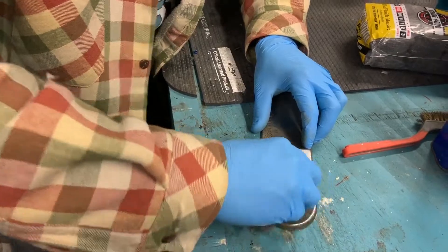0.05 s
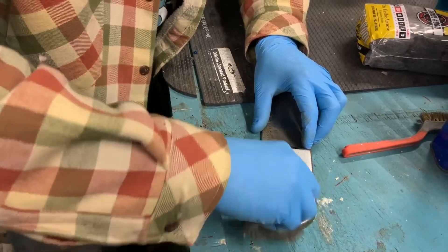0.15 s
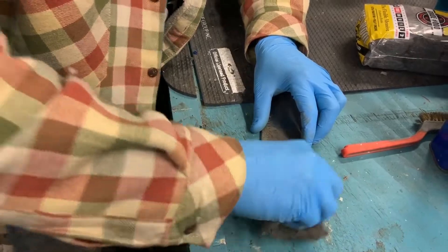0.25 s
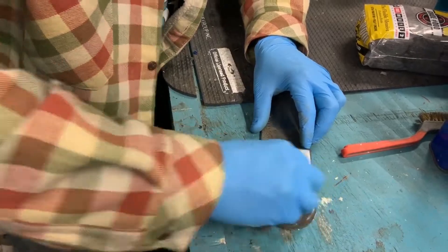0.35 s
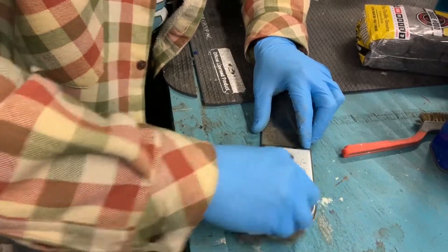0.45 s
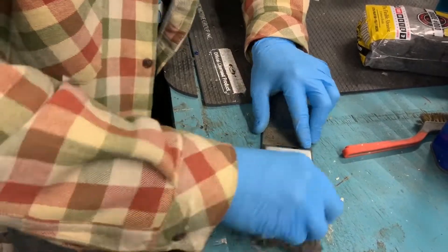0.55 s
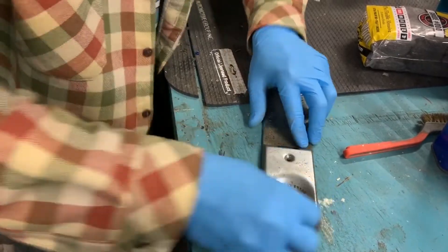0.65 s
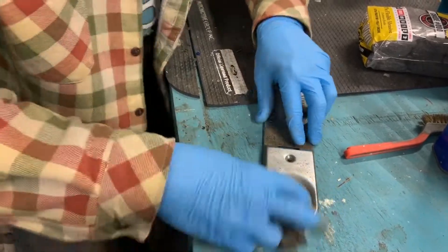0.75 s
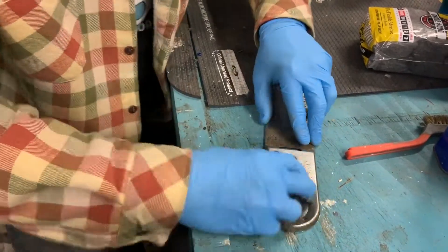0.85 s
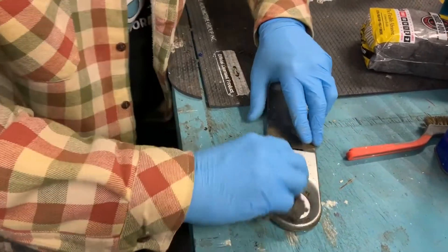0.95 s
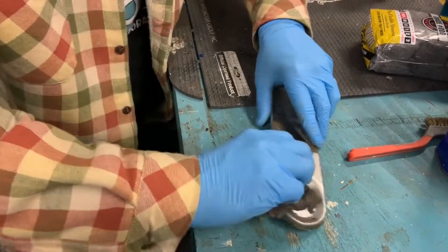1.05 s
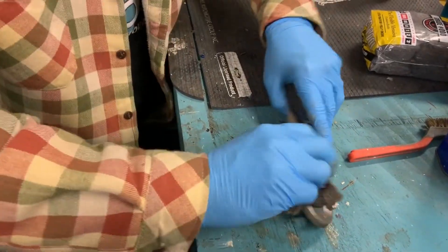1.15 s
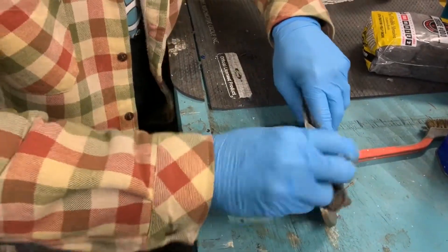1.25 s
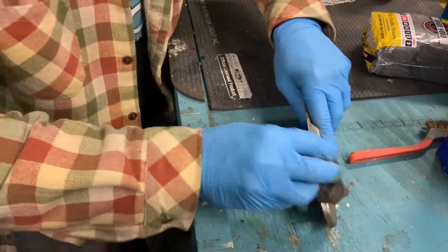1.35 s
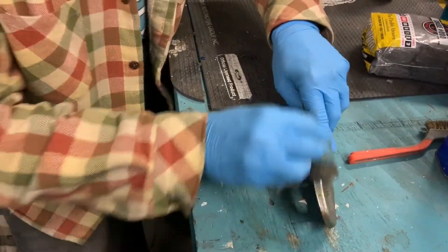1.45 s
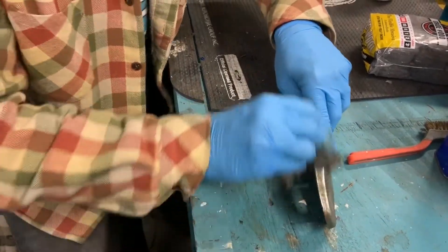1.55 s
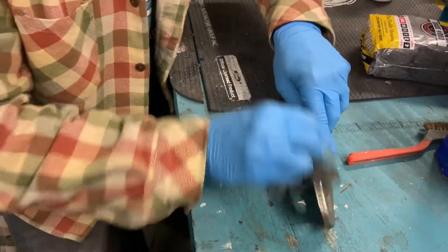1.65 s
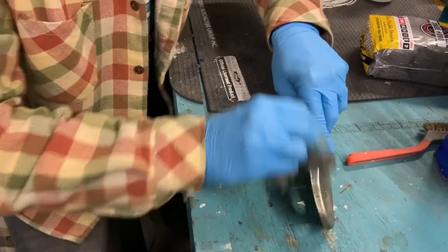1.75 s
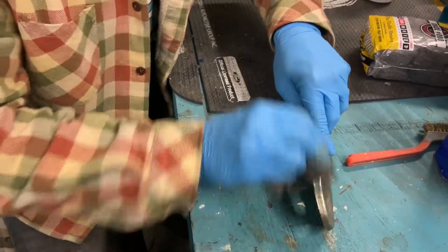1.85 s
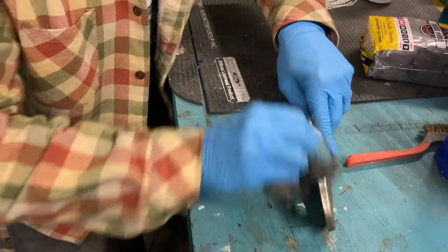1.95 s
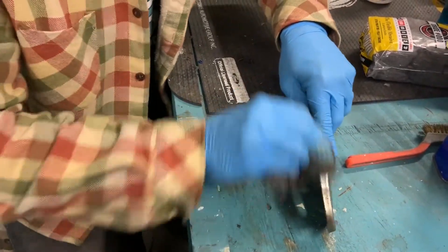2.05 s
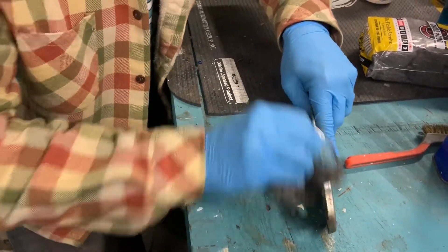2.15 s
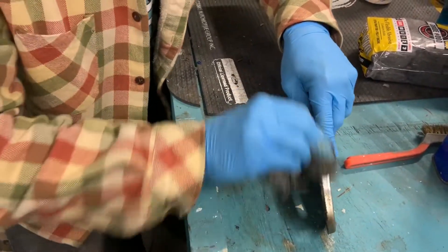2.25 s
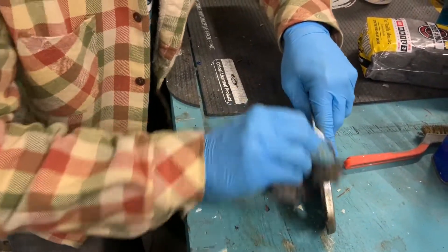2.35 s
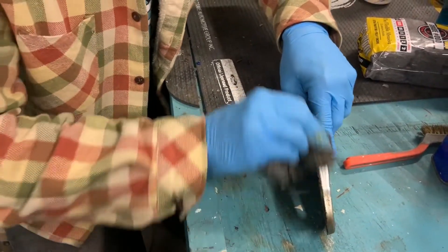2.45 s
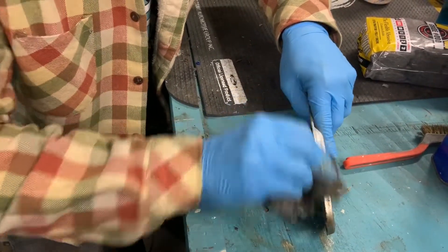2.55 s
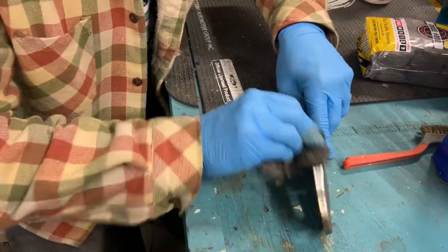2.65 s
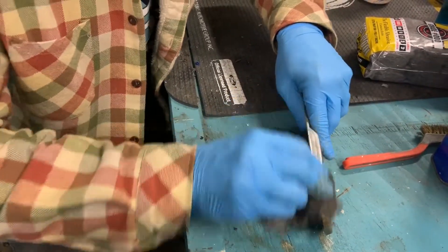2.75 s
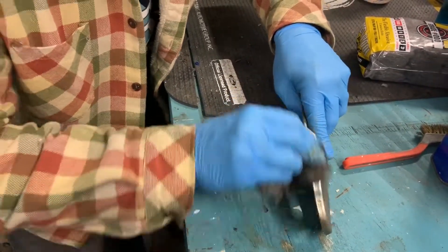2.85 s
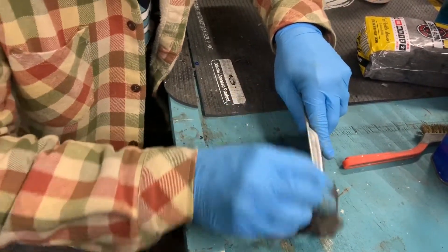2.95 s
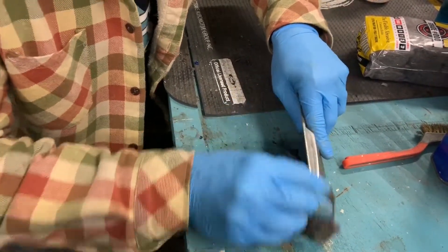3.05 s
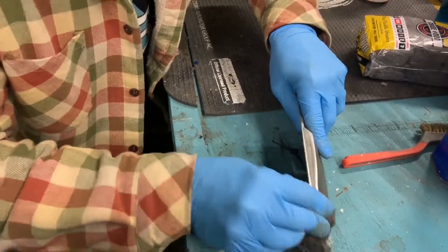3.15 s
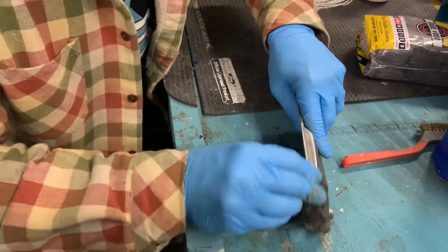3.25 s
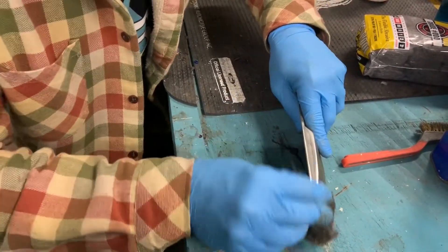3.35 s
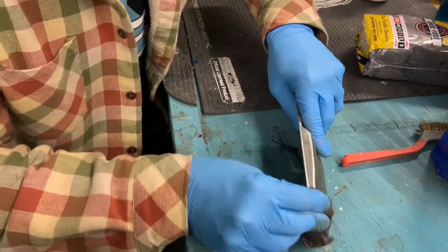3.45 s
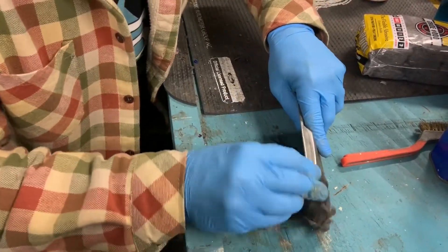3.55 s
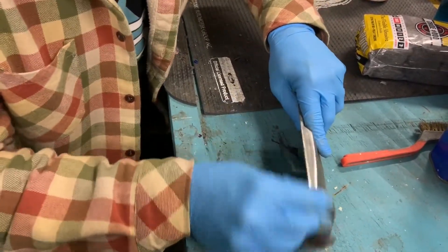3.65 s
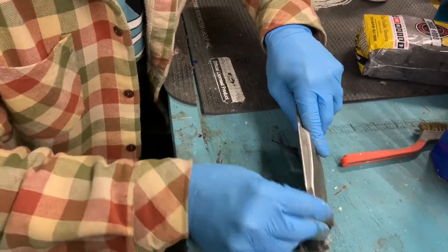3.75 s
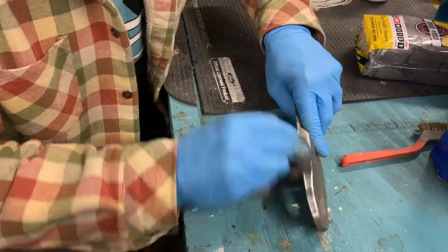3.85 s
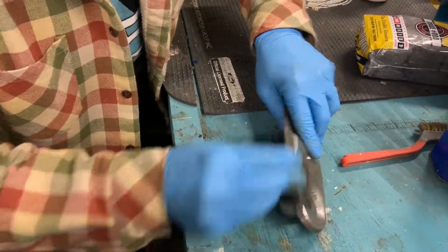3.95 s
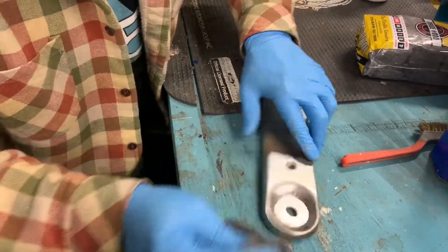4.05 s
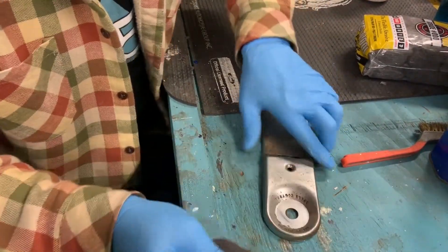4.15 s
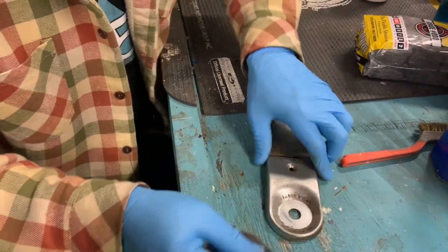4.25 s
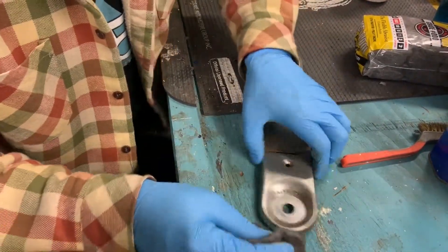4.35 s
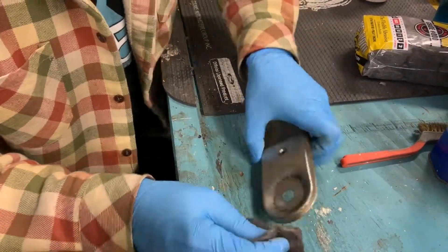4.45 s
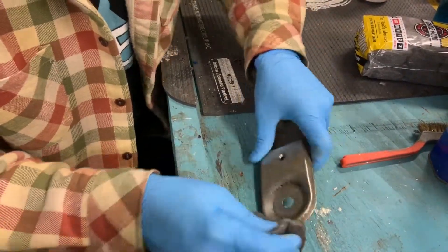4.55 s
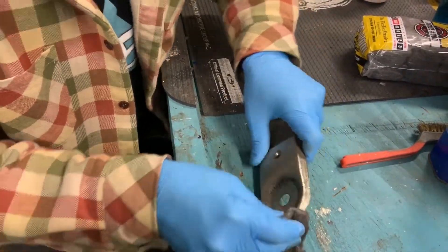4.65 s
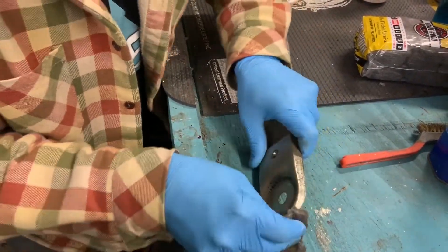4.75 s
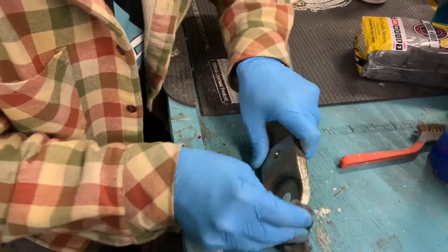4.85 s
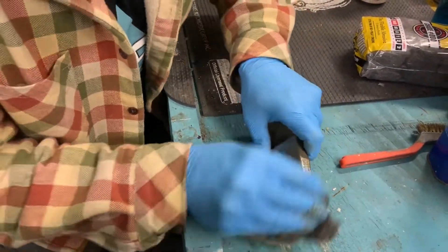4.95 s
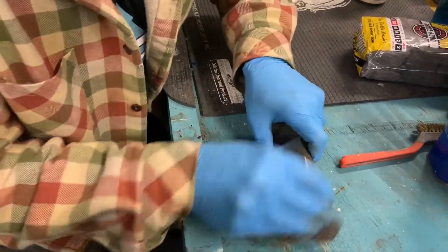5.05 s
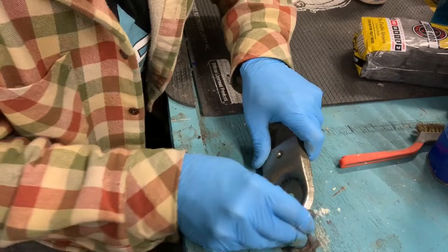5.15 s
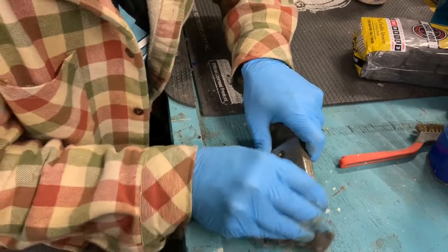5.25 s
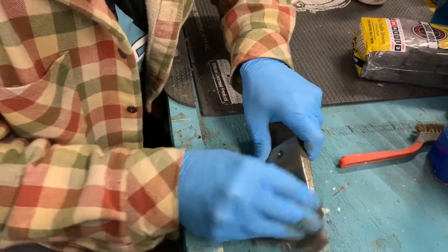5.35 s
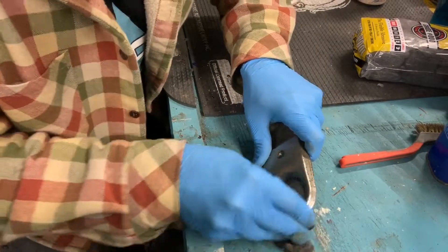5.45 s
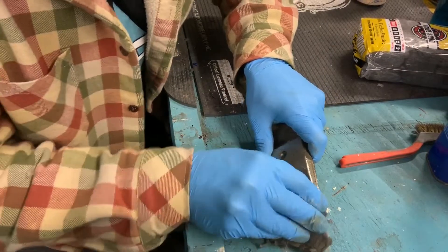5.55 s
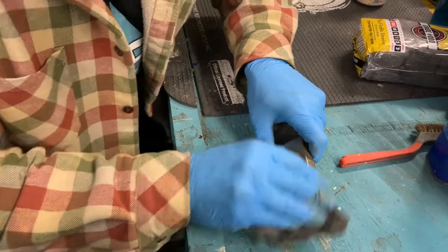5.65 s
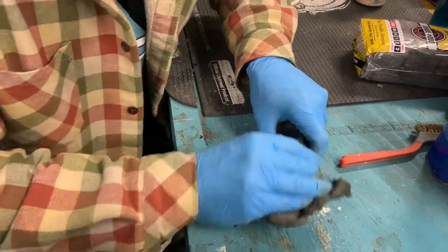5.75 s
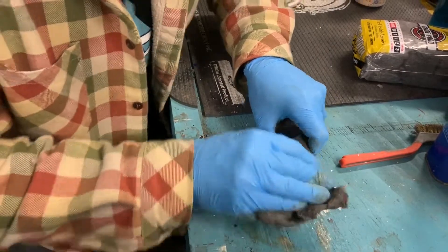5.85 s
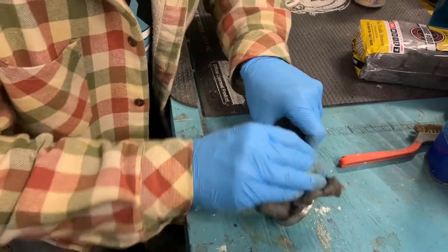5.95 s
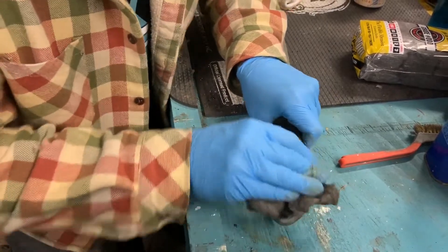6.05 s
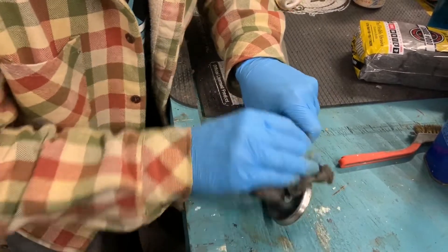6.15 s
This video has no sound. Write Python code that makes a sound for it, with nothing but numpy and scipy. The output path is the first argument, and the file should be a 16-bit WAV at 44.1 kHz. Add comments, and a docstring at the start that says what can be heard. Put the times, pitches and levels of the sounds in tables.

```python
"""In a small workshop, a gloved hand scrubs a chromed steel bracket with steel wool on a wooden bench.
Quick strokes drive noisy wire slips: they hiss, sing through steel resonances and make the bench drone.
The bracket tips over with a sharp clink, chatters, and is ticked and knocked upright: noise bursts and
decaying steel modes. Soft bumps, rustle and thin squeaks come from the handling. A close two-port
microphone hears it over low room tone and high hiss."""
import sys
import numpy as np
from scipy import signal
from scipy.fft import rfft, irfft, next_fast_len
from scipy.io import wavfile
from scipy.ndimage import uniform_filter1d, map_coordinates

SR = 44100
rng = np.random.default_rng(int(sys.argv[2]) if len(sys.argv) > 2 else 0)


def put_to_file(sound):
    """Save the sound as 16-bit audio at rate SR, in the file named by the first command-line argument."""
    columns = np.atleast_2d(sound).T  # one column per channel
    safe = np.clip(columns, -1, 1)
    whole_steps = np.round(safe * 32767)
    wavfile.write(sys.argv[1], SR, whole_steps.astype(np.int16))


N = 273861  # length in samples


def amp(db):
    """Decibels to gain."""
    return 10 ** (np.asarray(db) / 20)


def unit(x):
    """Scaled to rms 1."""
    return x / np.sqrt(np.mean(x ** 2) + 1e-20)


def along(points, hz):
    """(Hz, value) points read on a log frequency axis."""
    point_hz, values = np.transpose(points)
    return np.interp(np.log(hz + 1), np.log(point_hz + 1), values)


def at(rows, s):
    """The columns of a time curve, read at s seconds."""
    times, *columns = np.transpose(rows)
    return np.array([np.interp(s, times, column) for column in columns])


def colour(points):
    """Response through (Hz, dB) points, falling away beyond the ends."""
    lowest_hz, highest_hz = points[0][0], points[-1][0]

    def response(hz):
        falloff = 1 + (lowest_hz / (hz + 1)) ** 4 + (hz / highest_hz / 2) ** 8
        return amp(along(points, hz)) / np.sqrt(falloff)
    return response


def body(modes):
    """Causal response of a few damped resonances, (Hz, width Hz, dB), of alternating sign."""
    def response(hz):
        total = 0
        for k, (centre, width, db) in enumerate(modes):
            damping = 1j * hz * width
            total = total + (-1) ** k * amp(db) * damping / (centre * centre - hz * hz + damping)
        return total
    return response


def filtered(x, response):
    """x shaped by a response of frequency."""
    n = x.shape[-1]
    padded = next_fast_len(n + 8192)
    spectrum = rfft(x, padded) * response(np.fft.rfftfreq(padded, 1 / SR))
    return irfft(spectrum, padded)[..., :n]


def wobble(rate):
    """A smooth random curve, rate knots a second."""
    knots = rng.standard_normal(int(N * rate / SR) + 4)
    return map_coordinates(knots, [np.arange(N) * rate / SR])


# likeness of the two ports: pitch_hz, likeness (correlation, 0-1)
LIKENESS = [(300, 0.97), (800, 0.76), (1200, 0.79), (1700, 0.38), (2600, 0.03), (4000, 0.34), (5500, 0.047),
            (6800, 0.14), (7800, 0.99), (15500, 1)]


def ports(pair):
    """Two unrelated signals become left and right, as alike at each frequency as the table asks."""
    def mid_side(hz):
        turn = np.arccos(np.clip(along(LIKENESS, hz), -1, 1)) / 2
        return np.array([np.cos(turn), np.sin(turn)])
    mid, side = filtered(pair, mid_side)
    return np.array([mid + side, mid - side])


def noise(response, size=N):
    """Coloured stereo noise of rms 1."""
    return unit(ports(filtered(rng.standard_normal((2, size)), response)))


def add(track, s, sound):
    """Mix a sound in at s seconds."""
    part = track[:, round(s * SR):][:, :sound.shape[-1]]
    part += sound[..., :part.shape[-1]]


def slips(drive, response, rate, smooth):
    """Wires catch and let go: tiny kicks (rate per s) over a smooth rub (share 0-1), ringing in a body."""
    chance = np.clip(rate / SR, 1e-4, 1)
    kicks = (rng.random(N) < chance) / chance
    share = np.clip(smooth, 0, 1)
    force = np.sqrt((1 - share) * kicks + share) * rng.standard_normal((2, N))
    response_rms = np.sqrt(np.mean(abs(response(np.linspace(0, SR / 2, 4096))) ** 2))
    return filtered(force * drive, response) / response_rms


def shifting(x, patchy_db):
    """The wires in contact keep changing, and the colour of the rub with them."""
    z = signal.stft(x, nperseg=512)[2]
    field = rng.standard_normal(z.shape[1:])
    field = uniform_filter1d(field, size=3, axis=0)  # blur across frequency
    field = uniform_filter1d(field, size=9, axis=1)  # blur across time
    gain = unit(amp(patchy_db * unit(field)))
    return signal.istft(z * gain, nperseg=512)[1][:, :N]


# spectra of the steady bed, relative before levelling: pitch_hz, level_db
ROOM_TONE = [(22, -1.5), (45, -1), (85, -3.5), (150, -16), (300, -12), (700, -30), (1300, -13),
             (2500, -41.5), (5000, -14.5), (7000, -44.5)]
HISS = [(6500, -32), (7800, -30), (8200, -1.5), (9500, 3.5), (10500, -0.5), (11600, -0.5), (12600, -5.5),
        (13800, 3.5), (15700, -0.5)]


def background():
    """Low room tone and a high hiss, each gently unsteady in level."""
    room_tone = amp(-55.0 + 2 * wobble(5.5)) * noise(colour(ROOM_TONE))
    hiss = amp(-43.0 + 2.7 * wobble(7.3)) * noise(colour(HISS))
    return room_tone + hiss


# strokes of the pad, pull and push in turn, level before swell and layer trims: start_s, end_s, level_db
STROKES = [(-.02, .115, -41.5), (.13, .255, -39.5), (.295, .44, -40.5), (.475, .555, -44),
           (.709, .828, -54.5), (1.018, 1.073, -51.5), (1.155, 1.244, -45), (1.379, 1.476, -30.5),
           (1.508, 1.587, -29.5), (1.609, 1.672, -27), (1.704, 1.79, -34), (1.801, 1.872, -25.5),
           (1.898, 1.975, -29), (1.997, 2.057, -23), (2.098, 2.168, -26.5), (2.19, 2.263, -25),
           (2.292, 2.366, -28), (2.401, 2.452, -28), (2.485, 2.55, -29), (2.568, 2.643, -29),
           (2.662, 2.756, -30.5), (2.782, 2.847, -31), (2.87, 2.952, -30.5), (3.02, 3.081, -34.5),
           (3.113, 3.244, -37.5), (3.29, 3.364, -37), (3.453, 3.533, -37.5), (3.585, 3.682, -33),
           (3.735, 3.858, -37), (4.197, 4.275, -45.5), (4.773, 4.864, -52), (4.87, 4.977, -37),
           (5.004, 5.063, -35.5), (5.156, 5.253, -41.5), (5.321, 5.389, -35), (5.436, 5.523, -43),
           (5.567, 5.692, -38), (5.72, 5.778, -46), (5.841, 5.901, -38.5), (5.937, 5.996, -40),
           (6.045, 6.107, -34), (6.145, 6.232, -33)]
# how the pad bears on the bracket; flat faces rasp, the edge fizzes, the tip shakes the bench;
# drives relative to the fizz: time_s, scrape_db, plate_rasp_db, bench_drone_db
CONTACT_COLOUR = [(.04, -20, 12.5, -3.5), (.18, -13, -0.5, -27), (.5, -14, 1, -18), (.8, 3.5, 5, -5.5),
                  (1.04, 5.5, 10, 6), (1.2, -3.5, -14, -16), (1.43, -3.5, -12, -13.5),
                  (1.6, -14, -22.5, -27.5), (2.45, -14.5, -25.5, -30), (2.62, -6, -15, -18),
                  (2.9, -8.5, -20, -18.5), (3.18, -8.5, -8.5, -5.5), (3.5, -10, -7.5, -10),
                  (3.63, -2, -5.5, 0.5), (4.26, 0, 11.5, -3.5), (4.81, 2, 8, 0), (5.2, -19.5, -13, -23),
                  (5.62, -7, -3, -10), (5.96, -2, -4, -15.5), (6.08, -13.5, -13, -26)]
# level slope per whole stroke, plus swells and minus fades: time_s, push_swell_db, pull_swell_db
SWELL = [(.05, -1.5, -5), (.36, 5, -5.5), (.8, -14, -9), (1.45, 7.5, -10), (2.65, 2, -15), (2.85, -6, -15),
         (3.15, -10, 2), (3.5, -1, 8), (3.63, -13.5, -17.5), (4.8, -10, -17), (4.95, -2.5, 0)]


def pressure(rise, fall):
    """Drive of each layer: a stroke speeds up, swells or fades, and slows to its turning point."""
    t, drive = np.arange(N) / SR, np.zeros((4, N))
    for k, (start, end, db) in enumerate(STROKES):
        middle = (start + end) / 2
        push_db, pull_db = at(SWELL, middle)
        swell_db = push_db if k % 2 else pull_db
        levels = db + np.append(0, at(CONTACT_COLOUR, middle))
        span = (t > start - .03) & (t < end + .03)
        u = (t[span] - start) / (end - start)  # position in the stroke, 0-1
        speeding = np.clip((u + 0.17) / rise, 0, 1)
        slowing = np.clip((1.17 - u) / fall, 0, 1)
        speed = np.sin(np.pi / 2 * speeding * slowing) ** 2
        swell = amp(swell_db * (np.clip(u, .15, .85) - .5))  # the slope acts on the middle 70 %
        drive[:, span] += amp(levels)[:, None] * speed * swell
    return drive


# the rasp sits higher or lower with the spot being rubbed: time_s, pitch_hz
RASP_PITCH = [(0, 1550), (2.9, 1650), (3.1, 1340), (4.8, 1450), (4.92, 2070), (5.351, 1700), (5.6, 1950)]
# plate resonances under the pressing hand: pitch_hz, width_hz, level_db (relative)
PLATE = [(1316, 52, 6), (1530, 210, 3), (1685, 51, -0.5), (1900, 39, 2.5), (2070, 96, 1)]


def plate_rasp(drive, octaves):
    """The plate's resonances answer most near the pitch of the rubbed spot."""
    centre_hz = np.interp(np.arange(N) / SR, *np.transpose(RASP_PITCH))
    weights = np.array([amp(db) / (1 + (np.log2(hz / centre_hz) / octaves) ** 2) for hz, _, db in PLATE])
    weights /= np.linalg.norm(weights, axis=0)
    out = np.zeros((2, N))
    for weight, (hz, width, _) in zip(weights, PLATE):
        out += slips(drive * weight, body([(hz, width, 0)]), rate=500, smooth=0.25)
    return out


# spectra of the wires and of their scrape on chrome, relative: pitch_hz, level_db
FIZZ = [(5000, -30.5), (7000, -36), (7850, -16.5), (8200, 5.5), (8650, 0.5), (10300, -3), (11700, 0),
        (12200, 3.5), (12600, -6), (13200, 4.5), (13450, -6), (13780, 0.5), (14400, -1), (15700, -3)]
SCRAPE = [(1200, -5.5), (2200, -5.5), (2700, -13), (4100, 1), (5000, 0), (6000, -2.5), (7500, 1),
          (9000, -3.5)]
# sharp steel resonances the wires excite, and the bench under the hand: pitch_hz, width_hz, level_db (relative)
CHROME = [(1888, 57, 0), (2716, 20, -14), (3117, 264, 2.5), (3750, 68, 4.5), (4765, 44, 4), (5740, 33, 10),
          (6670, 510, 0), (7740, 84, 6.5)]
BENCH = [(90.5, 26, -3.5), (233, 19, -3.5), (337, 27.4, 2), (479, 71, -6), (669, 48, -2), (839, 54, -4.5),
         (1136, 57, 0)]


def steel_wool():
    """The pad grips unevenly; its wires fizz and scrape, the steel sings and rasps, the bench drones."""
    fizz, scrape, rasp, drone = pressure(rise=0.46, fall=0.51)  # fractions of a stroke
    grip = amp(1.57 * wobble(70) + 0.98 * wobble(330))
    wires = amp(2.5) * slips(fizz * grip, colour(FIZZ), rate=2400, smooth=1.0)
    chrome = amp(-2.0) * slips(scrape * grip, colour(SCRAPE), rate=1700, smooth=0.83)
    singing = amp(-3.5) * slips(scrape * grip, body(CHROME), rate=1500, smooth=0.32)
    plate = amp(-3.5) * plate_rasp(rasp * grip, octaves=0.36)
    bench = amp(0.3) * slips(drone * grip, body(BENCH), rate=400, smooth=0.41)
    return ports(shifting(wires + chrome + singing, patchy_db=3.5) + plate + bench)


# the pad and gloves keep dragging lightly between strokes, level before trim and wobble: time_s, level_db
DRAG = [(0, -45), (.6, -46.5), (1.4, -51.5), (2.3, -50), (2.95, -46), (3.4, -55.5), (3.7, -47), (4.45, -40),
        (4.7, -45), (5.0, -46), (5.12, -70.5), (5.45, -52.5), (6.2, -61)]
# spectrum of the rustle, relative: pitch_hz, level_db
RUSTLE = [(150, -4.5), (300, -5), (550, -6), (1400, -3), (2000, -1.5), (2600, -7.5), (3500, -3.5),
          (5000, -6.5), (7500, -6)]


def dragging():
    """Loose wires and rubber rustle unevenly while the hands move: slips at a wandering level."""
    level_db = np.interp(np.arange(N) / SR, *np.transpose(DRAG))
    level_db = level_db + 0.7 * wobble(25) + 0.91 * wobble(150) - 2.5
    rustle = slips(amp(level_db), colour(RUSTLE), rate=640, smooth=0.87)
    return ports(shifting(rustle, patchy_db=4.5))


# faint rubbery squeaks under the glove, before wobble:
# start_s, end_s, first_hz, top_hz, last_hz, level_db
SQUEAKS = [(0.096, 0.358, 323.5, 376, 330, -55.5), (0.696, 1.067, 570, 625, 550, -62.5)]


def squeaks():
    """Thin, slightly unsteady tones whose pitch rises and falls in one arch."""
    out = np.zeros((2, N))
    for start, end, first_hz, top_hz, last_hz, db in SQUEAKS:
        t = np.arange(start, end, 1 / SR)
        pitch = np.interp(t, [start, (start + end) / 2, end], [first_hz, top_hz, last_hz])
        pitch *= 1 + 0.014 * wobble(87)[:len(t)]
        level = amp(db + 3 * wobble(36)[:len(t)]) * signal.windows.tukey(len(t), .5)
        add(out, start, level * np.sin(2 * np.pi * np.cumsum(pitch) / SR))
    return out


# soft bumps of the hands and the bracket on the bench, level before the envelope: time_s, level_db, pitch_hz
BUMPS = [(0.779, -38, 176), (0.999, -38, 99), (1.031, -39, 246), (3.61, -32, 45), (4.041, -20, 88),
         (4.111, -28, 192), (4.411, -25, 81.5), (4.623, -31, 302), (4.659, -35.5, 97), (5.955, -38.5, 229)]


def bumps():
    """Soft blows push the bench top for a few low cycles: a decaying sine with noise around its pitch."""
    out, t = np.zeros((2, N)), np.arange(SR // 3) / SR
    for s, db, hz in BUMPS:
        wood = noise(colour([(hz / 2, -6), (hz, 0), (hz * 1.74, -9)]), size=len(t))
        thud = np.sin(2 * np.pi * hz * t) + 0.58 * wood
        envelope = amp(db - 60 * t / 0.14) * (1 - np.exp(-t / 0.0041))
        add(out, s, envelope * thud)
    return out


# the holding hand shifts its grip, drive level before wobble: start_s, end_s, level_db
REGRIPS = [(1.0, 1.29, -50.5), (3.57, 3.845, -51), (4.547, 4.81, -51)]
# spectrum of the fumbling, relative: pitch_hz, level_db
FUMBLE = [(40, -3.5), (90, 6.5), (150, -0.5), (230, -4), (400, -19), (700, -25)]


def regrips():
    """Fingers and bracket fumble on the wood in small random thuds."""
    t, drive = np.arange(N) / SR, np.zeros(N)
    for start, end, db in REGRIPS:
        progress = np.clip((t - start) / (end - start), 0, 1)
        drive += amp(db) * np.sqrt(abs(np.sin(np.pi * progress)))
    return ports(slips(drive * amp(3.0 * wobble(30)), colour(FUMBLE), rate=80, smooth=0.22))


FAVOUR_DB, FAVOUR_OCTAVES = 5.5, 0.26  # each point of contact favours the modes near one pitch


def ring(modes, t, favoured_hz):
    """Steel modes, struck at new strengths each time; the higher ones reach each port at their own phase."""
    out = np.zeros((2, len(t)))
    for hz, db, t60 in modes:
        port_phase = rng.normal(0, .7) * min(hz / 2800, 1) ** 2
        phase = rng.uniform(0, 2 * np.pi) + np.array([[1], [-1]]) * port_phase
        favour_db = FAVOUR_DB * np.exp(-(np.log2(hz / favoured_hz) / FAVOUR_OCTAVES) ** 2)
        level = amp(db + favour_db + 2 * rng.normal() - 60 * t / t60)
        out += level * np.sin(2 * np.pi * hz * t + phase)
    return out * (1 - np.exp(-t / 0.00033))


# the bracket meets the bench, levels before envelope and dulling:
# time_s, clack_db, free_ring_db, wooden_knock_db, hardness_hz, favoured_hz
CONTACTS = [(4.032, -17, -31, -55, 2000, 1303), (4.038, 2, -18.5, -19.5, 15900, 1303),
            (4.0435, -36, -37, -19.5, 9100, 8400), (4.078, -39, -22.5, -28, 4000, 1303),
            (4.098, -9, -18.5, -23, 2950, 1876), (4.109, -10, -26, -18, 2490, 1860),
            (4.124, -18, -28, -28.5, 4500, 3700), (4.155, -14, -45, -25, 2990, 1876),
            (4.4963, -8, -57, -15.5, 2000, 1303), (4.623, -47.5, -56, -37.5, 1200, 1303)]
# ticks on the edge of the gripped bracket: time_s, ring_db, crack_db, favoured_hz
TICKS = [(4.391, -25.5, -13.5, 8860), (4.4966, -33.5, -32, 8360)]
# modes of the bracket ringing free, and while gripped: pitch_hz, level_db (relative), t60_s
STEEL = [(231, -13, .3), (306, -9, .36), (673, -15, .24), (809, -16, .26), (1147, -17, .35),
         (1303, -5, .38), (1561, -11, .32), (1617, -14, .4), (1650, -13, .22), (1771, -9, .28),
         (1876, -1, .33), (2329, -11, .33), (2420, -13, .18), (2550, -14, .18), (2912, -16, .33),
         (3041, -11, .75), (3616, -12, .25), (3693, -9, .24), (3717, -8, .24), (4484, -13, .26),
         (4850, -16, .17), (5065, -12, .16), (5360, -16, .16), (5675, -10, .24), (6611, -26, .18),
         (7650, -17, .18), (8242, -8, .13), (8441, -4, .11), (8877, -7, .12), (11530, -10, .13),
         (13850, -13, .12), (14380, -15, .13)]
GRIPPED = [(2552, -8, .09), (3052, -7, .11), (3680, -11, .06), (4850, 3, .075), (5420, -5, .06),
           (6500, -10, .06), (7052, -4, .065), (8330, -1, .1), (8860, 1, .08), (10800, -1, .08),
           (12730, 2, .08), (14130, -1, .08)]
# spectra of the clack and the wooden knock, relative: pitch_hz, level_db
CLACK = [(300, 1.5), (900, -18.5), (1300, 4.5), (1800, 3), (2300, -16), (4000, -12), (6500, -55),
         (7800, -23), (8400, -14), (15500, -22)]
KNOCK = [(40, -34), (90, -2), (160, -12), (240, -2), (340, -2), (520, -14.5), (680, 2), (950, -5),
         (1200, 0), (2200, -23.5), (6000, -16.5)]


def bracket():
    """Each contact is a clack, a ring of the steel and a knock of the wood; softer contacts are duller."""
    out, t = np.zeros((2, N)), np.arange(SR * 3 // 5) / SR
    clack_fade = (amp(-60 * t / 0.022) + amp(-21 - 60 * t / 0.036)) * (1 - np.exp(-t / 0.00061))
    knock_fade = amp(-60 * t / 0.13) * (1 - np.exp(-t / 0.0011))
    for s, clack_db, ring_db, knock_db, hard_hz, favoured_hz in CONTACTS:
        clack = amp(clack_db) * noise(colour(CLACK), size=len(t)) * clack_fade
        knock = amp(knock_db) * noise(colour(KNOCK), size=len(t)) * knock_fade
        blow = clack + amp(ring_db) * ring(STEEL, t, favoured_hz) + knock
        add(out, s, filtered(blow, lambda hz: 1 / (1 + 1j * hz / hard_hz)))
    crack_colour = colour([(2000, 3.5), (7500, -15.5), (8500, 5), (15500, 14.5)])
    for s, ring_db, crack_db, favoured_hz in TICKS:
        crack = noise(crack_colour, size=len(t)) * amp(crack_db - 60 * t / 0.05)
        add(out, s, amp(ring_db) * ring(GRIPPED, t, favoured_hz) + crack)
    return out


# spectrum of the chatter, relative: pitch_hz, level_db
CHATTER = [(200, -8), (350, 5.5), (520, -9), (1100, 0), (1800, -4.5), (2400, -5.5), (3000, -13),
           (4000, -26), (6000, -48)]
CHATTER_S, CHATTER_DB, CHATTER_FADE_DB_PER_S = 4.11, -26.5, 117  # start, drive level, loss


def chatter():
    """The fallen bracket rattles on the wood in a dying run of tiny contacts."""
    t = np.arange(N) / SR - CHATTER_S
    fade = amp(CHATTER_DB - CHATTER_FADE_DB_PER_S * np.maximum(t, 0))
    drive = np.clip(t / 0.014, 0, 1) * fade
    return ports(slips(drive, colour(CHATTER), rate=300, smooth=0.51))


# decay of the room: pitch_hz, t60_s
WORKSHOP = [(100, 0.95), (1000, 0.18), (5000, 0.33), (15000, 0.022)]


def workshop(x):
    """The room's short answer: a noise tail whose decay time depends on frequency."""
    hz, t, z = signal.stft(rng.standard_normal((2, SR // 2)), SR, nperseg=256)
    decay = amp(-60 * t / along(WORKSHOP, hz)[:, None])
    tail = ports(signal.istft(z * decay, SR, nperseg=256)[1])
    delayed = np.pad(x.mean(0), (250, 0))[None]  # the answer comes 250 samples late
    return signal.fftconvolve(delayed, tail / np.linalg.norm(tail[0]), axes=1)[:, :N]


def scene():
    """Scrubbing and handling on the bench, in the room."""
    work = steel_wool() + dragging() + squeaks() + bumps() + regrips() + bracket() + chatter()
    return work + amp(-13) * workshop(work) + background()


TOP_HZ = 15780  # upper edge of the band


def record(dry):
    """The top octave reaches the right a little earlier; peaks past full scale clip; the band ends steeply."""
    def port_phase(hz):
        lead = np.pi * np.clip((hz - 7750) / 3800, 0, 2)
        return np.exp(1j * np.array([-lead, lead]))
    spaced = filtered(dry, port_phase)
    return filtered(np.clip(spaced, -1, 1), lambda hz: hz < TOP_HZ)


dry = scene()
out = record(dry)
put_to_file(out)
```